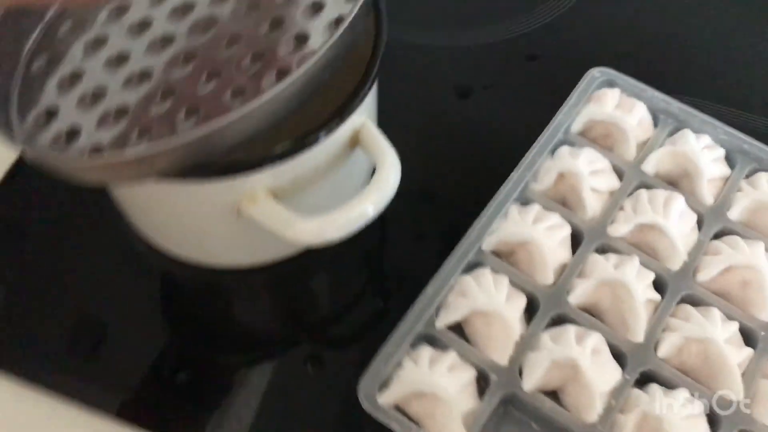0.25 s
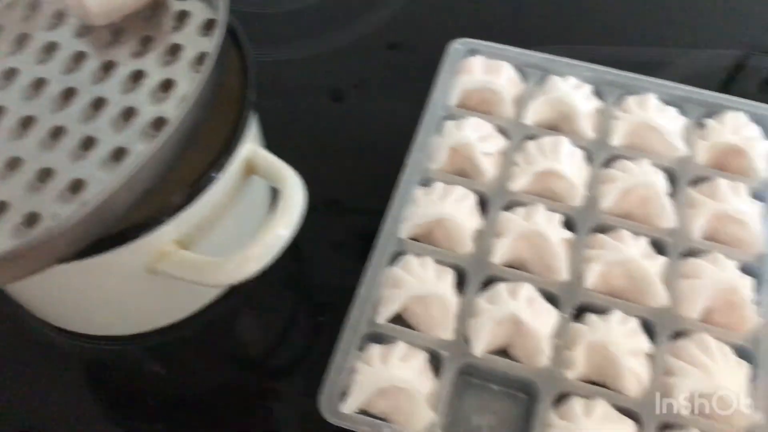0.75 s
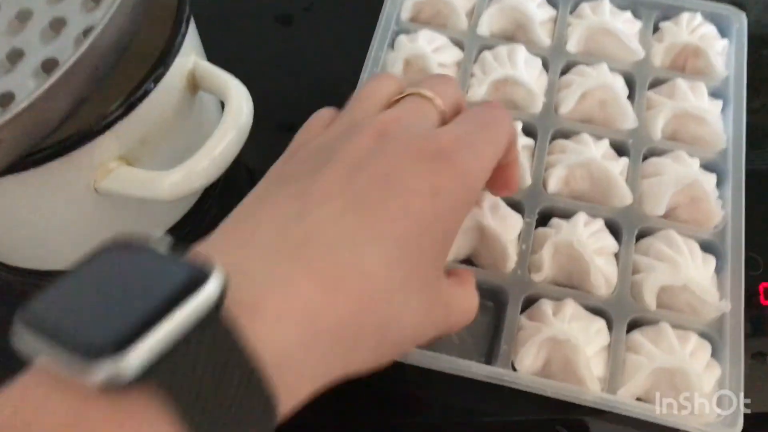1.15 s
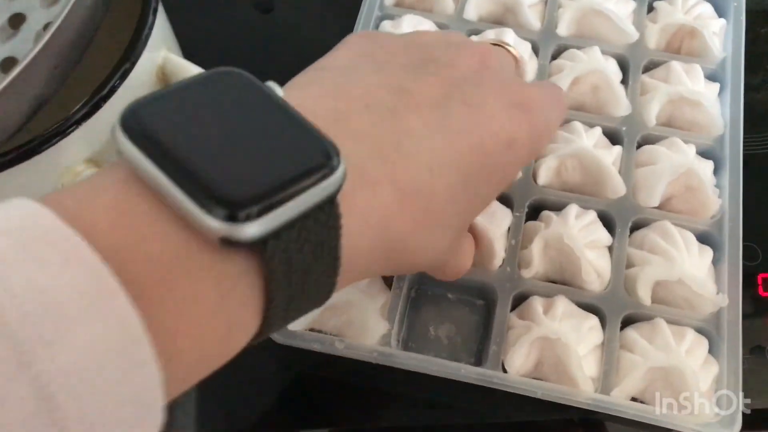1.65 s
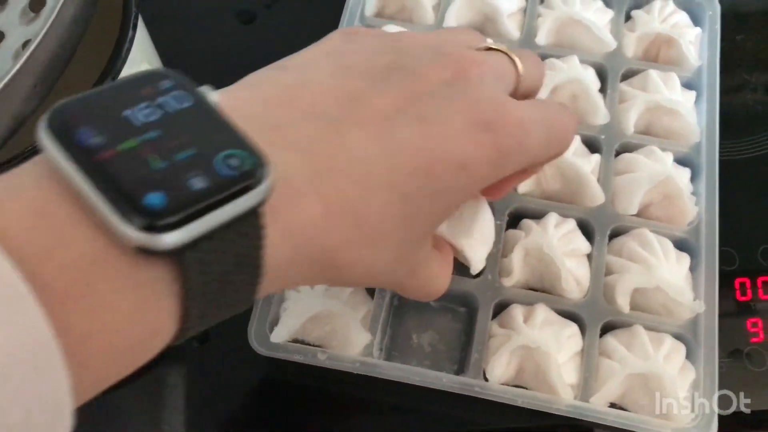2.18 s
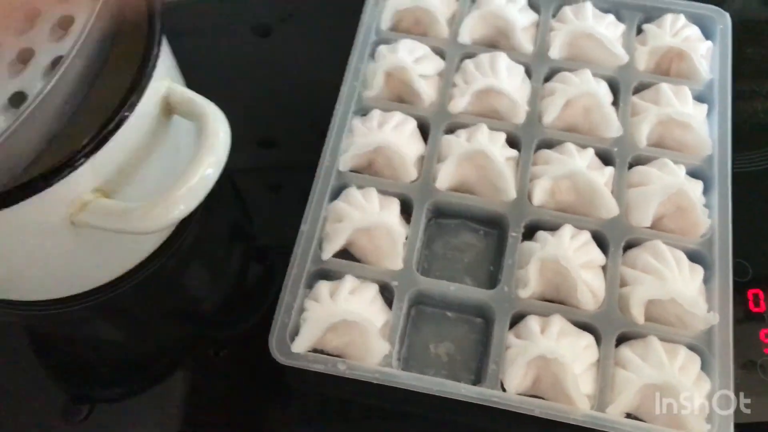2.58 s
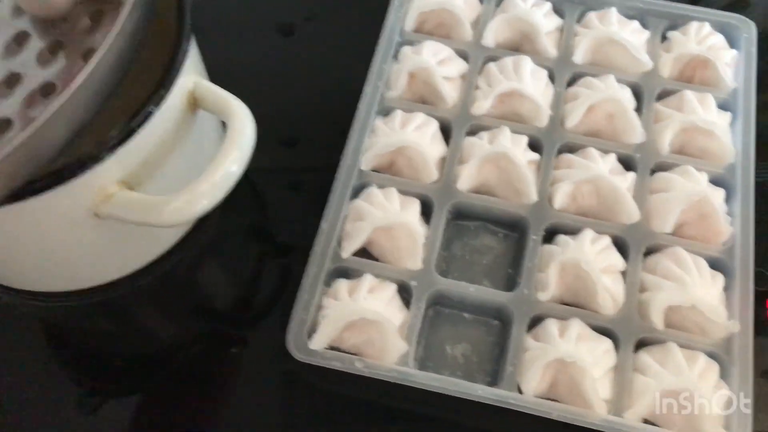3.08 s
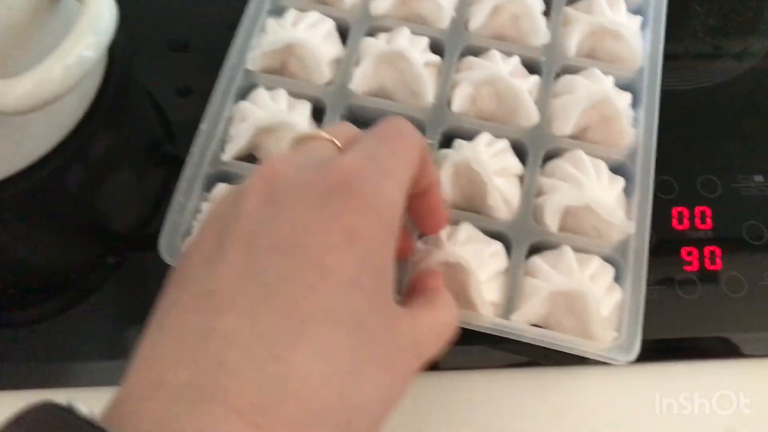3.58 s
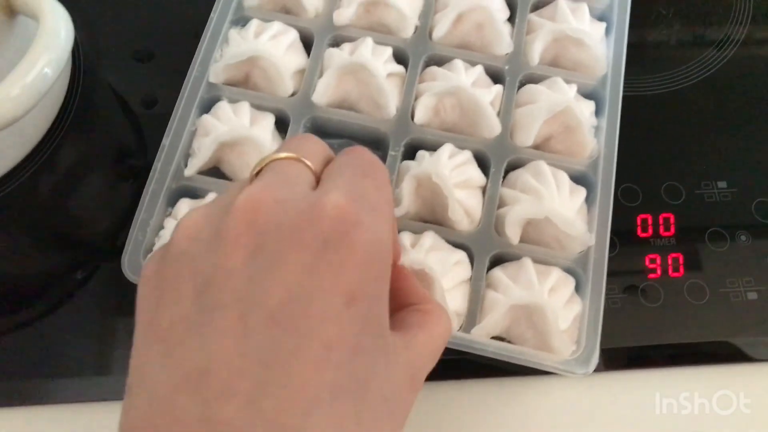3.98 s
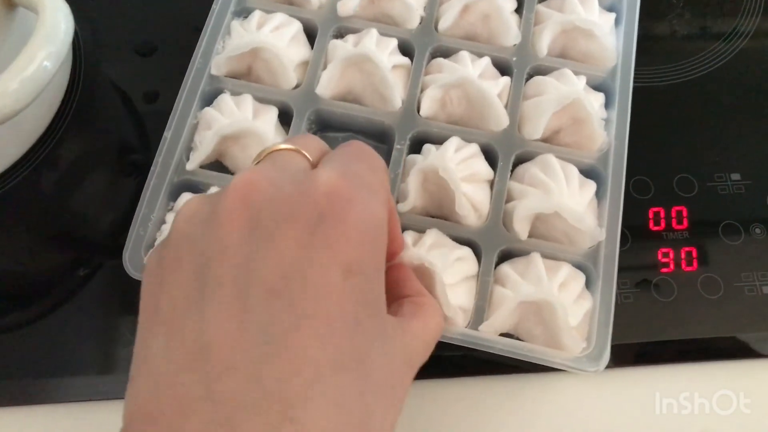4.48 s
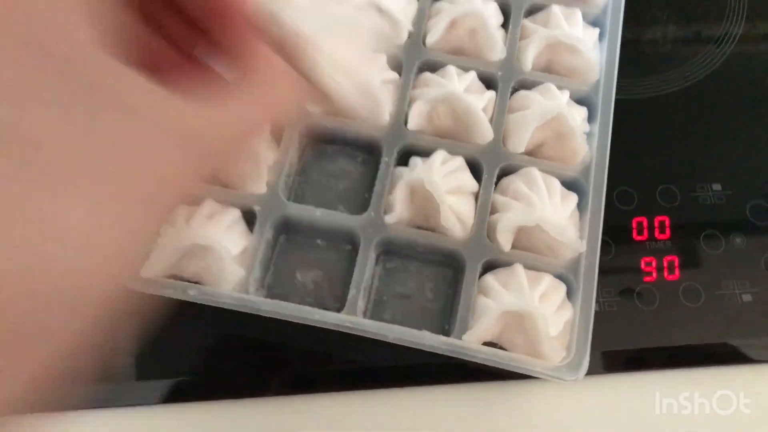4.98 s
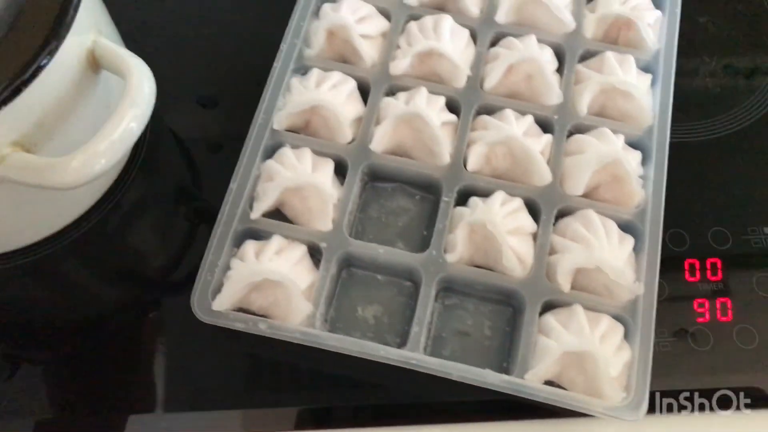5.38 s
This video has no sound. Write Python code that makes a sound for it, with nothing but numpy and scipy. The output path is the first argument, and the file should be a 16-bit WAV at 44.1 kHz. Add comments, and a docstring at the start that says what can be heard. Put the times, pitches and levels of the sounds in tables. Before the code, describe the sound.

Thin plastic tray snaps and crackles twice as frozen dumplings are pried out, with light metal steamer clinks and dull knocks in a quiet kitchen.

```python
"""A perforated metal steamer clinks on its pot and knocks sound on a glass hob. Then a thin plastic tray
snaps and crackles in two bouts as a hand pries out two frozen dumplings: its walls buckle, frost and
creases give way. The tray knocks on the glass, the counter booms, the steamer clinks again.
Quiet kitchen with a short echo and appliance hum; a phone microphone is held close above."""
import sys
import numpy as np
from scipy import signal
from scipy.io import wavfile
from scipy.ndimage import uniform_filter1d

SR = 44100
rng = np.random.default_rng(int(sys.argv[2]) if len(sys.argv) > 2 else 0)


def to_wav(s):
    """Save 16-bit WAV."""
    ch = np.atleast_2d(s).T  # columns
    pcm = np.round(np.clip(ch, -1, 1) * 32767)  # PCM
    wavfile.write(sys.argv[1], SR, pcm.astype(np.int16))


N = 248724


def tray_snaps():
    """A wall buckles: a sharp crack that dies first in the treble; wall and rib ring roughly."""
    # (time [s], body level [dB], wall [Hz], rib [Hz], brightness [dB], body t60 [s])
    snaps = [(1.1775,-33,2680,3940,-4.5,0.045),(1.1987,-43,2280,6900,8.5,0.076),(1.21,-35.5,1140,3180,-9,0.053),(1.2277,-29,1580,4080,-4,0.046),(1.2806,-50,2720,5400,6.5,0.041),(1.3546,-45,2600,4430,4.5,0.065),(1.3694,-38.5,3030,4300,4,0.044),(1.3804,-40,2400,3500,-2,.046),(1.4034,-38,1960,6500,2.5,0.028),(1.4349,-43,1140,3980,-14,0.034),(1.4609,-29.5,1510,3270,-14,.055),(1.4697,-40.5,3000,4240,14,0.023),(1.4904,-45,1700,3830,3,0.031),(1.5054,-34,1640,4350,3,0.041),(1.5128,-28.5,1770,3300,1,0.028),(1.5222,-46,2630,4530,8,.045),(1.5348,-43.5,1440,3900,4,0.035),(1.5723,-39,2410,4320,-8,0.027),(1.5843,-43,2070,6010,-10,0.027),(1.5965,-35,2400,6700,7,0.036),(1.5997,-41,1970,6740,4,0.029),(1.6063,-27,2700,5440,3,0.043),(1.6307,-36.5,2420,6800,6.5,0.025),(1.6616,-27.5,2320,3230,-2.5,0.05),(1.666,-34,3230,3280,0,0.033),(1.6769,-30,990,3270,-20,0.025),(1.6848,-38,1500,3900,0,0.071),(1.6954,-40.5,2250,3210,-10,.04),(1.7762,-49.5,1490,3270,7,.045),(1.7863,-40,2180,5260,-0.5,0.066),(1.8223,-34.5,1980,7100,4.5,0.085),(1.8282,-38,2040,4880,-1,0.12),(1.8372,-42.5,2100,3400,10,.04),(1.8528,-33.5,2040,4000,-2,0.063),(1.8585,-42,2020,3780,2,0.088),(1.868,-29.5,1960,4800,2.5,0.093),(1.8736,-17,2090,3100,-2.5,0.042),(1.9025,-43,1890,4890,8,.04),(1.9145,-45,1820,4740,8,0.048),(1.929,-41,1920,4030,1,.059),(1.9356,-23.5,1920,4900,2.5,0.073),(1.9455,-17,3100,3860,0,0.037),(1.9853,-20,1990,3300,-3.5,0.037),(1.9921,-34,2000,4680,12,0.046),(2.0043,-25,2070,4340,-6,.046),(2.0101,-21.5,2500,3270,-6,0.031),(2.0227,-27.5,2180,4540,6,0.04),(2.0423,-24.5,2000,7130,1.5,0.072),(2.0499,-20.5,2130,3470,-14,0.043),(2.0576,-23,1570,4460,0,0.048),(2.7145,-43.5,3250,3100,-4.5,0.04),
             (3.5777,-41,2460,3080,8,0.029),(3.6089,-34,3040,6150,4,0.029),(3.7138,-49,3080,4560,5,0.049),(3.7345,-31.5,1420,3640,6,0.036),(3.7447,-48,1510,5020,12,0.064),(3.7709,-39,3180,3540,5,0.022),(3.7762,-28,1430,3600,5,0.045),(3.7982,-27,1400,3670,4,.032),(3.8256,-31,2360,5390,-6,0.064),(3.8341,-45.5,2530,3210,14,0.046),(3.845,-25.5,2920,3370,-12,0.044),(3.8523,-33.5,2880,3330,4,0.044),(3.862,-32,2920,3280,2.5,0.045),(3.8936,-59,2360,3410,1,0.033),(3.9138,-33,3200,4800,6.5,0.043),(3.9532,-30.5,2850,5300,0,0.085),(3.9666,-24.5,2140,3680,1.5,0.054),(3.97,-25,2080,4550,2,0.027),(3.9782,-22,2880,3420,0.5,0.045),(4.004,-40,2770,3420,-2,.04),(4.1429,-41,2400,3200,-3,0.032),(4.1889,-39.5,2650,5200,9.5,0.026),(4.2307,-43,2020,4400,-2.5,0.031),(4.2839,-49,3120,3550,9.5,0.045),(4.3584,-32,1860,3900,-3,0.033),(4.3791,-30,1540,3630,-3.5,0.041),(4.4349,-42,2800,3450,9.5,0.035),(4.5161,-18,2170,4730,3,0.044),(4.5551,-40,2290,5180,-15,0.044),(4.5709,-42,3000,3210,8.5,0.024),(4.6077,-44,1780,4840,6.5,0.049),(4.6249,-33.5,2930,4870,-1,0.069),(4.6374,-40,3200,3100,8.5,.049),(4.6413,-31,1490,5500,1,0.056),(4.6506,-31,2000,4240,-2.5,0.1),(4.6633,-34,980,6360,2.5,0.029),(4.7409,-46,2150,3670,-15,.04),(4.7578,-39,2130,3700,-5.5,0.041),(4.7678,-37.5,1250,3250,-6,0.067),(5.009,-46,1980,6300,3,0.079)]
    out, t = np.zeros(N), np.arange(2400) / SR
    lead = 300  # samples for the filters to settle
    noise = rng.standard_normal((len(snaps), 2, len(t) + lead))
    hiss = tray_colour(noise[:, 0])
    bands_hz = [(700, 1034), (1250, 3540), (3200, 6920), (7000, 19400)]
    give, body, crack, sizzle = (unit_rms(band(hiss, *edges)[:, lead:]) for edges in bands_hz)
    slap = 1 + 0.69 * np.exp(-t / 0.00072)  # hardest at onset
    ring_share = 1 / (1 + gain(3))  # of the power
    ring_amp, noise_amp = np.sqrt([ring_share, 1 - ring_share])
    for k, (time_s, level_db, wall_hz, rib_hz, bright_db, t60_s) in enumerate(snaps):
        wall = unit_rms(resonate_twice(noise[k, 1], wall_hz, 0.15 * wall_hz)[lead:])
        rib = unit_rms(resonate_twice(noise[k, 1], rib_hz, 0.23 * rib_hz)[lead:])
        low = noise_amp * (body[k] + gain(-17) * give[k]) + ring_amp * wall
        mid = noise_amp * crack[k] + ring_amp * rib
        low, mid, high = (part / np.std(part[:200]) for part in (low, mid, sizzle[k]))
        decay_db = -60 * t / t60_s
        snap = np.sqrt(slap) * gain(decay_db) * low * attack(t, 0.00023)
        snap += slap * gain(bright_db + 0.7 + 1.22 * decay_db) * mid
        snap += slap * gain(1.48 * bright_db - 3.5 + 1.3 * decay_db) * high
        add(out, time_s, gain(level_db) * snap * attack(t, 0.000082))
    return out


def tray_crackle():
    """Frost and small creases give way in tiny ticks while fingers bend the tray."""
    # one list per grip: (time [s], level [dB], treble tilt [dB])
    grips = [
        [(1.12, -49.5, -10), (1.206, -38.5, -4), (1.348, -47, -10.5), (1.528, -35.5, -8.5), (1.654, -55, 4),
         (1.976, -46, 7), (2.1, -79, 0)],
        [(3.46, -46.5, -8.5), (3.66, -56, -4.5), (3.902, -38.5, -7), (4.02, -60, -5)],
        [(4.12, -48, -13.5), (4.4, -52, -1), (4.594, -48.5, -10), (4.738, -47.5, -15.5), (4.82, -56, -16)],
    ]
    t, level, tilt_db = np.arange(N) / SR, np.zeros(N), np.zeros(N)
    for grip in grips:
        time_s, grip_db, grip_tilt_db = np.transpose(grip)
        level += gain(np.interp(t, time_s, grip_db, -200, -200))
        tilt_db += np.interp(t, time_s, grip_tilt_db, 0, 0)
    ticks_per_s, power_decay_s = 400, 0.00051
    tick_db = 4 * np.minimum(rng.exponential(1, N), 4)
    ticks = gain(tick_db) * (rng.random(N) < ticks_per_s / SR)
    power = signal.lfilter([1], [1, -np.exp(-1 / (power_decay_s * SR))], ticks ** 2)
    grains = tray_colour(np.sqrt(power) * rng.standard_normal(N))
    low, high = unit_rms(band(grains, 590, 3640)), unit_rms(band(grains, 1860, 22000))
    return level * (gain(-8.5 - tilt_db / 2) * low + gain(-3 + tilt_db / 2) * high)


def tray_colour(x):
    """Broad resonances of the moulded plastic over a flat share."""
    # (centre [Hz], width [Hz], gain [dB])
    resonances = [(2220, 1400, 10.5), (4570, 570, 13), (6740, 240, 1), (9400, 980, -0.5), (13000, 1300, -3)]
    return gain(5) * x + sum(gain(db) * resonate(x, hz, width_hz) for hz, width_hz, db in resonances)


def hob_knocks():
    """Blows on the glass top: a dull tap, plate modes, and the counter's slower boom."""
    # (time [s], level [dB], boom trim [dB], tap trim [dB])
    knocks = [(0.284, -42, 13, 3), (0.448, -36, 2.5, -10), (1.225, -47, 9, 9), (1.511, -45, 7.5, 12.5),
              (1.674, -45, 5, 1), (2.797, -40.5, 3, -5), (3.965, -27.5, -4, 8.5), (4.001, -33, 2, 5.5),
              (4.183, -38.5, -9, 4), (4.65, -29.5, 3, 9), (4.665, -34, 6.5, 10), (4.769, -48, 10, 12),
              (5.221, -37.5, 12, 1), (5.239, -43.5, 13.5, 2), (5.272, -37, 7, -1), (5.336, -45, -4, 17.5)]
    # both: (frequency [Hz], level [dB], t60 [s])
    glass_modes = [(250.7, -5, 0.13), (339.5, -2.5, 0.28), (415, -1.5, 0.25), (493, -0.5, 0.13),
                   (613, -3, 0.11), (778, -4, 0.15)]
    counter_modes = [(65, 0.5, 0.095), (91.5, -6.5, 0.33), (117.2, 1, 0.089)]
    out, t = np.zeros(N), np.arange(SR // 3) / SR
    tap_t60_s = 0.067
    for time_s, level_db, boom_db, tap_db in knocks:
        tap = unit_rms(band(rng.standard_normal(len(t)), 177, 1160))
        tap *= gain(tap_db - 8.5 - 60 * t / tap_t60_s)
        plate = gain(-9.5) * ring(glass_modes, t, spread_db=1.5) * attack(t, 0.002)
        boom = gain(boom_db - 5.5) * ring(counter_modes, t, spread_db=2.5) * attack(t, 0.0052)
        add(out, time_s, gain(level_db) * (tap + plate + boom))
    return out


def steamer_clinks():
    """Thin metal touches the pot: a short contact rattle and ringing modes."""
    # (time [s], level [dB], rattle t60 [s], ring trim [dB])
    clinks = [(0.2866, -37.5, 0.29, -0.5), (0.3116, -40, 0.052, 5), (0.3608, -46, .056, 0),
              (0.4465, -29.5, 0.057, -4.5), (0.4546, -41.5, 0.23, 9), (0.4848, -28, 0.044, -1),
              (0.4942, -36.5, 0.1, 2.5), (2.7892, -36.5, 0.099, -6.5), (2.8206, -44, 0.061, 0),
              (2.932, -30, 0.058, -7), (3.021, -32.5, 0.08, -14), (3.0947, -44, 0.12, -4),
              (5.216, -39.5, 0.051, -5), (5.2437, -32.5, 0.052, -5.5), (5.2697, -29, 0.12, -2.5),
              (5.332, -29.5, 0.061, -9.5)]
    # (frequency [Hz], level [dB], t60 [s])
    steamer_modes = [(828, -4, .09), (957, 0, .2), (1235, -7, .15), (1490, -4, .09), (2350, -6, .09),
                     (2690, -8, .12), (3710, -4, .1), (3860, -4, .12), (4150, -10, .15), (5040, -5, .12),
                     (5400, -3, .15), (6500, -13, .07), (6970, -10, .1), (7600, -9, .1), (8630, -9, .08)]
    out, t = np.zeros(N), np.arange(SR // 5) / SR
    for time_s, level_db, t60_s, ring_db in clinks:
        noise = rng.standard_normal(len(t))
        rattle = gain(-4) * band(noise, 1140, 3300) + gain(-6) * band(noise, 4700, 16000)
        rattle *= gain(-60 * t / t60_s)
        metal = gain(ring_db - 14) * ring(steamer_modes, t, spread_db=3)
        add(out, time_s, gain(level_db) * (rattle + metal) * attack(t, 0.00054))
    return out


def kitchen_echo(x):
    """Sparse reflections of random sign, each band dying at its own rate."""
    # (frequency [Hz], t60 [s])
    decay_times = [(200, 0.93), (1300, 0.44), (3500, 0.48), (9000, 0.25)]
    taps = np.zeros(SR // 2)
    slots = np.arange(200, SR // 2 - 20, 20)
    taps[slots + rng.integers(0, 20, len(slots))] = rng.choice([-1., 1.], len(slots))
    hz, t, spectrum = signal.stft(taps, SR, nperseg=256)
    decay_db = -60 * t / log_interp(decay_times, hz)[:, None]
    tail = signal.istft(spectrum * gain(decay_db), SR, nperseg=256)[1]
    return signal.fftconvolve(x, tail / np.linalg.norm(tail))[:N]


def room_noise():
    """Room and microphone noise; patches of the spectrum and the treble level drift."""
    # (frequency [Hz], relative density [dB])
    noise_shape = [(15, -51), (25, -21), (42, -5.5), (102, -1), (141, -19.5), (242, -5), (284, -14),
                   (462, -9), (558, -15.5), (815, -12), (908, -14), (1220, -14), (1520, -17.5), (3140, -21),
                   (15900, -27)]
    # (time [s], treble level [dB])
    treble_drift = [(0, 2.5), (.6, 1), (1, -1), (2.5, 0), (3.3, -1.5), (4.9, -2), (5.2, 0)]
    frames, hz = N // 256 + 5, np.fft.rfftfreq(1024, 1 / SR)[:, None]
    real, imag, patches = rng.standard_normal((frames, len(hz), 3)).T
    patches_db = unit_rms(uniform_filter1d(uniform_filter1d(patches, 12, 0), 10, 1))
    treble_weight = np.clip(np.log2((hz + 1) / 500) / 3, 0, 1)
    drift_db = treble_weight * np.interp(np.arange(frames) * 256 / SR, *np.transpose(treble_drift))
    spectrum = (real + 1j * imag) * gain(log_interp(noise_shape, hz) + patches_db + drift_db)
    return gain(-53) * unit_rms(signal.istft(spectrum, nperseg=1024, noverlap=768)[1][:N])


def appliance_hum():
    """Appliances drone in wavering bands of noise."""
    # (centre [Hz], width [Hz], level [dB])
    drones = [(96, 39, -61), (825, 36, -66.5), (2070, 330, -67), (471, 34, -78)]
    noise = rng.standard_normal(N)
    return sum(gain(db) * unit_rms(resonate_twice(noise, hz, width_hz)) for hz, width_hz, db in drones)


def ring(modes, t, spread_db):
    """Decaying modes; each blow lands elsewhere, so strengths and signs scatter."""
    hz, db, t60_s = np.transpose(modes)[:, :, None]
    struck_db = db + spread_db * rng.standard_normal(hz.shape)
    sign = rng.choice([-1, 1], hz.shape)
    return (sign * gain(struck_db - 60 * t / t60_s) * np.sin(2 * np.pi * hz * t)).sum(0)


def resonate(x, hz, width_hz):
    """Two-pole resonance, unity gain at centre."""
    return signal.lfilter(*signal.iirpeak(hz, hz / width_hz, SR), x)


def resonate_twice(x, hz, width_hz):
    return resonate(resonate(x, hz, width_hz), hz, width_hz)


def band(x, low_hz, high_hz):
    return signal.sosfilt(signal.butter(3, [low_hz, high_hz], "band", fs=SR, output="sos"), x)


def attack(t, rise_s):
    return 1 - np.exp(-t / rise_s)


def gain(db):
    return 10 ** (np.asarray(db) / 20)


def unit_rms(x):
    return x / np.sqrt(np.mean(x ** 2) + 1e-20)


def log_interp(points, hz):
    """Curve read on a log-frequency axis."""
    point_hz, value = np.transpose(points)
    return np.interp(np.log(hz + 1), np.log(point_hz + 1), value)


def add(mix, time_s, sound):
    part = mix[round(time_s * SR):][:len(sound)]
    part += sound[:len(part)]


def scene():
    """Close sources, their echo and the background; mono."""
    near = tray_snaps() + tray_crackle() + hob_knocks() + steamer_clinks()
    return (near + gain(-14) * kitchen_echo(near) + room_noise() + appliance_hum())[None]


def record(dry):
    """The microphone drops deep bass, colours the treble in its housing and limits the band."""
    # (frequency [Hz], gain [dB])
    mic_response = [(3000, 0.5), (4200, 0), (5000, -2), (5800, 0.5), (6800, -0.5), (7600, -2.5),
                    (8800, 2.5), (10500, -3), (11800, 2.5), (13000, 1), (15500, 0)]
    low_cut_hz, high_cut_hz = 50, 15900
    hz = np.linspace(0, SR / 2, 129)
    housing = signal.firwin2(127, hz, gain(log_interp(mic_response, hz)), fs=SR)
    lowpass = signal.firwin(511, high_cut_hz, window=("kaiser", 9), fs=SR)
    thinned = signal.sosfilt(signal.butter(5, low_cut_hz, "high", fs=SR, output="sos"), dry)
    coloured = signal.oaconvolve(thinned, housing[None], "same")
    return signal.oaconvolve(coloured, lowpass[None], "same")


dry = scene()
out = record(dry)
to_wav(out)
```